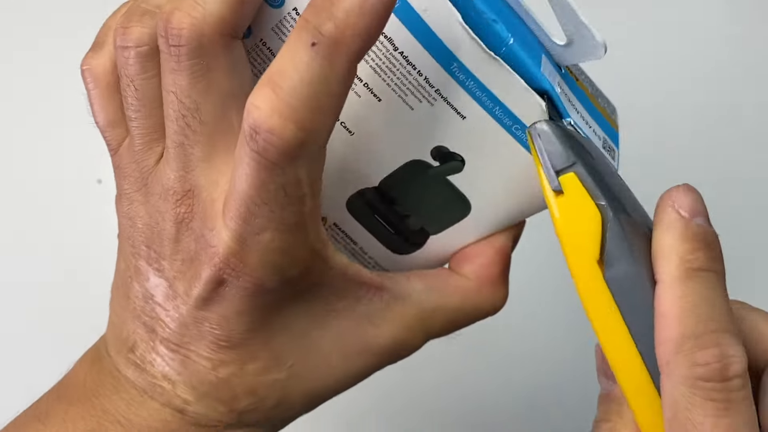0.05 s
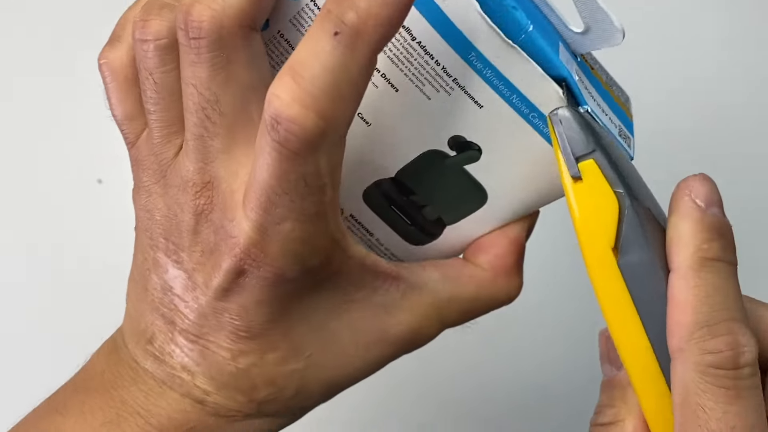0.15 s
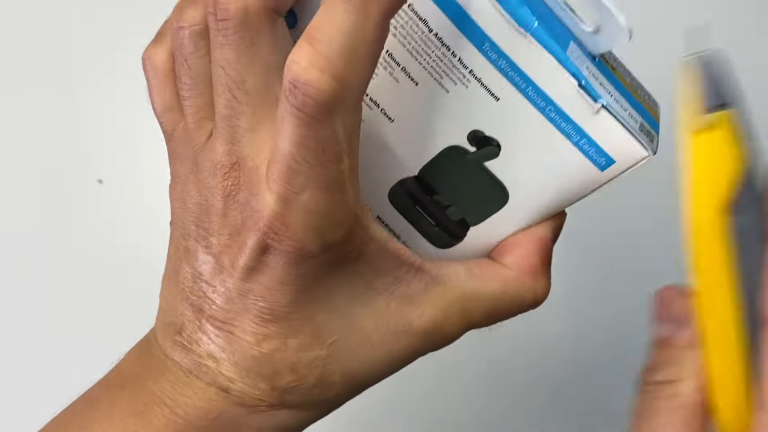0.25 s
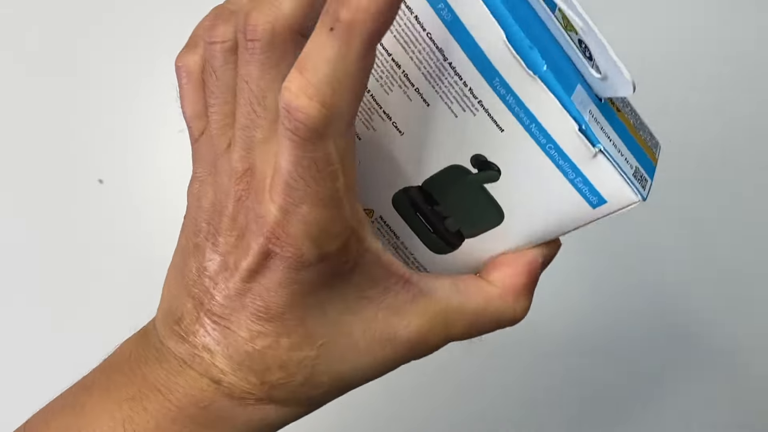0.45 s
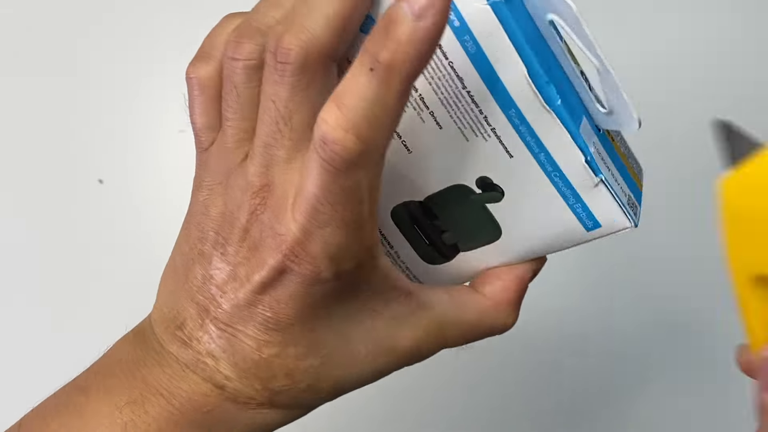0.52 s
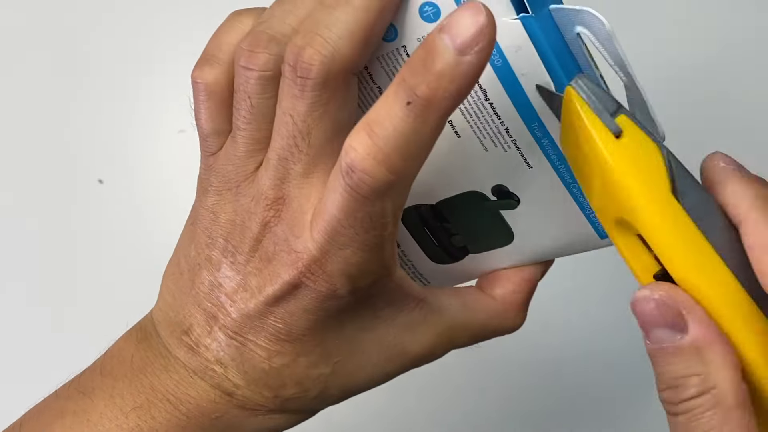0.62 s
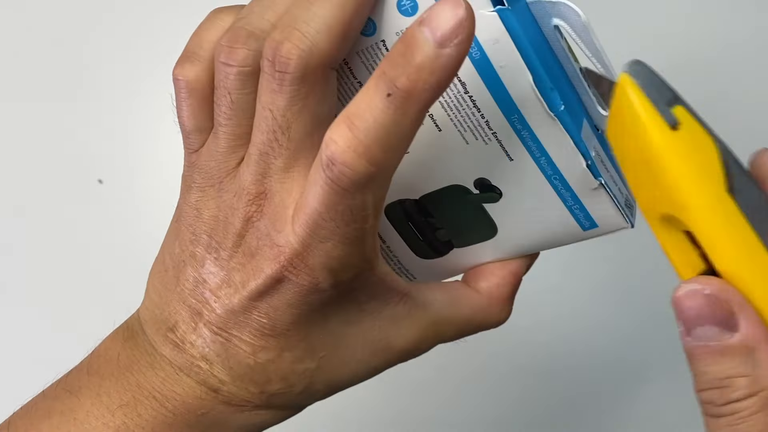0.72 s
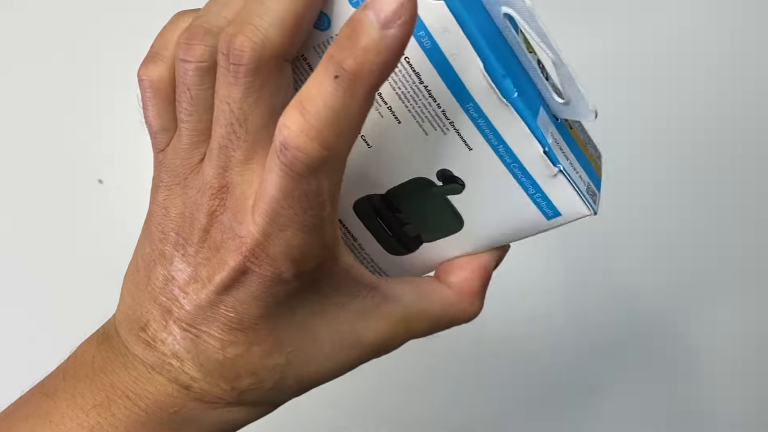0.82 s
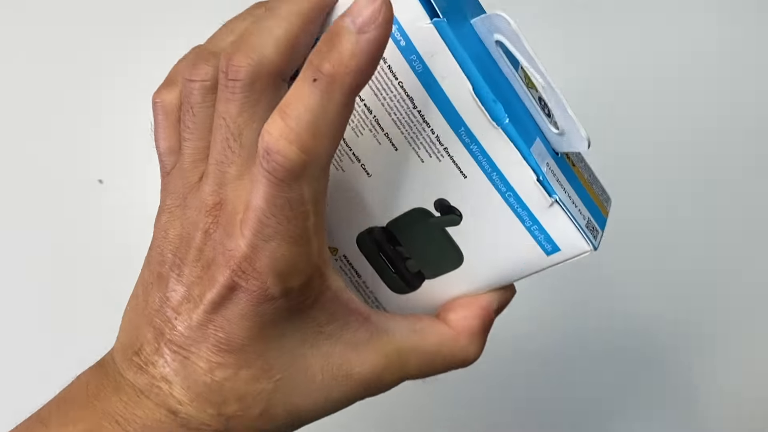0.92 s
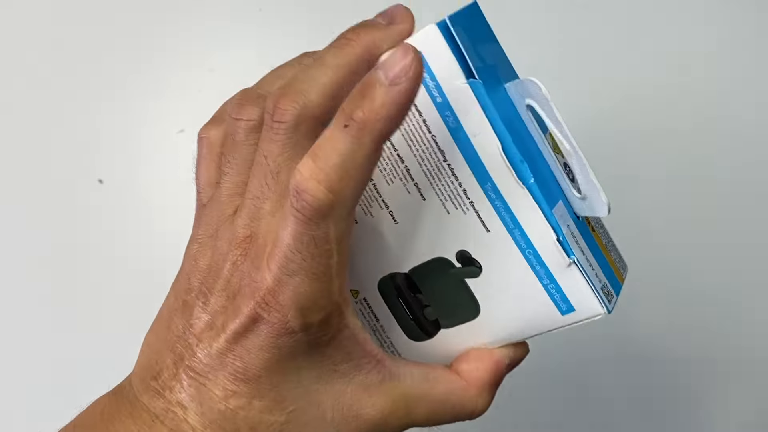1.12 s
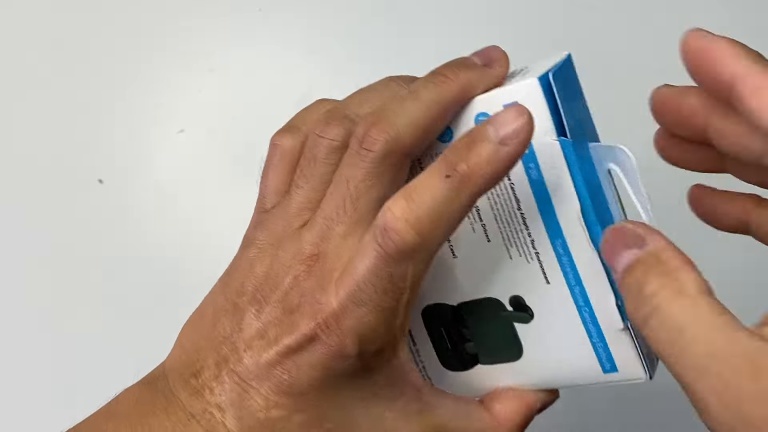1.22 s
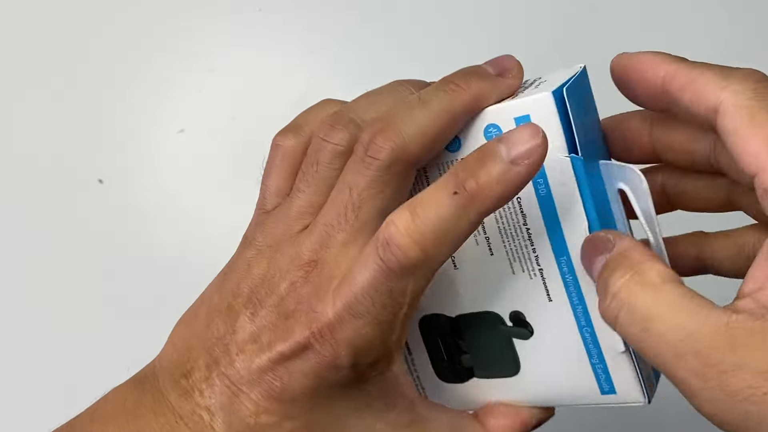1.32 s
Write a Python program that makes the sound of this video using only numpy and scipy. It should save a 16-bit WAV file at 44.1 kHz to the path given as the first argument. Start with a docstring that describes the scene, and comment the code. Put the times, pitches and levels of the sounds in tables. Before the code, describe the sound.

Close to the microphone in a quiet room, a blade cuts a small carton's tape seal with ticks and a sharp snap. A double clack follows as the knife is put down, then the box scuffs and thuds softly.

```python
"""In a quiet room, close to the microphone, a utility knife cuts the tape seal of a small cardboard box.
The blade drags, ticks through the tape and breaks free with a snap. The knife is laid on the table with a
double clack; the box is shifted, scuffs over the table top and settles with a soft thud. Impacts excite
the damped modes of card, handle and table; friction is a stream of tiny random slips. The room adds
faint reverberation, ventilation rumble and mains hum."""
import sys
import numpy as np
from scipy import signal
from scipy.fft import rfft, irfft
from scipy.io import wavfile

SR = 44100
rng = np.random.default_rng(int(sys.argv[2]) if len(sys.argv) > 2 else 0)


def to_wav(s):
    """Save 16-bit WAV."""
    ch = np.atleast_2d(s).T  # columns
    pcm = np.round(np.clip(ch, -1, 1) * 32767)  # PCM
    wavfile.write(sys.argv[1], SR, pcm.astype(np.int16))


N = 59535
T = np.arange(N) / SR
FREQS = np.arange(N + 1) * SR / (2 * N)


def from_db(db):
    """The decibel scale: 20 dB is a factor of ten in amplitude."""
    return 10 ** (np.asarray(db) / 20)


def coloured(x, colour):
    """Spectral shaping: noise is filtered to the given colour, then scaled to unit rms."""
    hz, db = np.transpose(colour)
    gain = from_db(np.interp(np.log(FREQS + 1), np.log(hz), db))
    shaped = irfft(rfft(x, 2 * N) * gain)[..., :N]
    return shaped / np.sqrt(np.mean(shaped ** 2))


def envelope(start, hold, attack, release):
    """Exponential decay: after a linear rise, it sets in at start + hold with time constant release."""
    return np.clip((T - start) / attack, 0, 1) * np.exp(-np.maximum(T - start - hold, 0) / release)


def rubbed(strokes, colour, per_s, spread_db):
    """Stick-slip friction: tiny random slips swell and fade with the pressure of each stroke."""
    pressure = sum(from_db(db) * envelope(start, length, 0.45 * length, release)
                   for start, length, db, release in strokes)
    sizes = from_db(spread_db * np.minimum(rng.exponential(1, N), 4))
    slips = (rng.random(N) < per_s / SR) * sizes * rng.choice([-1, 1], N)
    return pressure * coloured(slips, colour)


def struck(hits, modes, rise_s, uneven_db):
    """Modal superposition: each hit rings all modes, which swell as bending waves cross the body."""
    hz, db, t60 = np.transpose(modes)[:, :, None]
    travel_s = 0.0011 * np.sqrt(1000 / hz)  # dispersion: higher bending waves arrive sooner
    t = np.maximum(T[:SR // 5] - travel_s, 0)
    rings = np.sin(2 * np.pi * hz * t) * from_db(db - 60 * t / t60) * (1 - np.exp(-t / rise_s))
    octaves = np.log2(hz) - np.log2(hz).mean()
    out = np.zeros(2 * N)
    for start, level_db, tilt_db in hits:
        i = max(int(start * SR), 0)
        gains = from_db(level_db + tilt_db * octaves + uneven_db * rng.standard_normal(hz.shape))
        out[i:i + t.shape[1]] += (rings * gains).sum(0)
    return out[:N]


def crack(hits, level_db, hold_s, attack_s, release_s):
    """Contact noise: a brief broadband crunch accompanies each hit."""
    # spectrum of the crunch: f/Hz, level/dB
    colour = [(300, -16.5), (750, -12), (1400, -8), (2400, -0.5), (4000, -5), (6000, -5.5), (7500, -9.5),
              (10000, -10.5), (13000, -16), (15500, -18.5)]
    bursts = sum(from_db(db + level_db) * envelope(start, hold_s, attack_s, release_s)
                 for start, db, _ in hits)
    return bursts * coloured(rng.standard_normal(N), colour)


def diffuse(mid, side):
    """Diffuse-field coherence: the two microphone ports agree in the bass and differ in the treble."""
    corner_hz = 450
    side = irfft(rfft(side, 2 * N) * FREQS ** 2 / np.hypot(FREQS ** 2, corner_hz ** 2))[:N]
    return mid + side * [[1], [-1]]


def background():
    """Ambient noise: a diffuse field of ventilation rumble, with a faint pure tone of mains hum."""
    # spectrum of the rumble: f/Hz, level/dB
    colour = [(20, -25.5), (32, -18), (42, -5.5), (52, 5), (72, -6), (105, -5.5), (140, -11), (190, -17.5),
              (350, -17), (600, -22.5), (1200, -33), (2300, -33.5), (4000, -44), (7000, -66),
              (11000, -57.5), (16000, -75.5)]
    mid, side = from_db(-52) * coloured(rng.standard_normal((2, N)), colour)
    hum = from_db(-56.5) * np.sqrt(2) * np.sin(2 * np.pi * 120.2 * T)
    return diffuse(mid, from_db(-5) * side) + hum


def blade_drag():
    """Sliding friction: blade and fingers drag over the card in fine slips."""
    # strokes: t/s, length/s, level/dB, release/s
    slides = [(0, 0.05, -48.5, .01), (.044, 0.0091, -50, 0.0018), (0.153, .035, -67.5, 0.012),
              (.229, 0.006, -33.5, 0.0014), (0.337, .04, -66.5, 0.012), (.659, 0.0083, -57.5, 0.0064),
              (.72, .03, -67.5, 0.03), (.769, 0.008, -44.5, 0.0038), (0.824, .008, -59, 0.011),
              (1.035, 0.013, -51.5, .004)]
    # spectrum of the drag: f/Hz, level/dB
    colour = [(200, -13.5), (800, 1.5), (1600, 7.5), (3500, -1.5), (5500, -3), (7500, -11.5), (10000, -6.5),
              (13000, -11), (15500, -17)]
    return rubbed(slides, colour, per_s=2900, spread_db=1)


def finger_grips():
    """Dry friction: gripping fingers draw soft, dull rubs from the card."""
    # rubs: t/s, length/s, level/dB, release/s
    grips = [(0, 0.0097, -54, 0.014), (.0455, .006, -36, .003), (.623, 0.013, -45.5, 0.0029),
             (.979, 0.03, -51.5, 0.0047), (1.315, .015, -62, 0.0068)]
    # spectrum of a rub: f/Hz, level/dB
    colour = [(120, -11.5), (220, -2.5), (450, 8), (750, -10.5), (1100, -6), (1700, -9.5), (2800, -19),
              (5000, -29.5), (10000, -52), (15500, -51)]
    return rubbed(grips, colour, per_s=11000, spread_db=2.5)


def tape_ticks():
    """Impulse excitation: tape and card give way in small ticks, each ringing the carton."""
    # ticks: t/s, level/dB, tilt/(dB per octave)
    ticks = [(.0218, -0.5, 1.5), (.0468, -17, 1), (.0718, -5, 0), (.1308, 1.5, -0.5), (.1919, 3.5, 0.5),
             (.661, -25.5, 11), (1.0605, 0.5, 6), (1.0688, 0, 8), (1.0738, -13, -2)]
    # modes of the carton: f/Hz, level/dB, T60/s
    modes = [(1430, -23, 0.0099), (2630, -32.5, 0.0064), (3920, -21, 0.0069), (4640, -36, 0.016),
             (5600, -30.5, .009), (6500, -34.5, 0.0022), (9390, -40.5, .009), (10400, -47, .009),
             (12200, -42, .007), (15000, -45, .007)]
    ring = struck(ticks, modes, rise_s=0.00082, uneven_db=1)
    return ring + crack(ticks, level_db=-43.5, hold_s=0.004, attack_s=0.001, release_s=0.0015)


def box_knocks():
    """Resonance of a hollow body: soft knocks excite the low modes of the box."""
    # knocks: t/s, level/dB, tilt/(dB per octave)
    bumps = [(.046, -14, -7), (.2378, 3.5, -2), (.626, -16, -2), (.982, -12.5, 5), (.9885, -5, -12),
             (1.051, 3, 7.5), (1.0675, 7, -5), (1.074, -3, -2), (1.323, -30, 0)]
    # modes of the box: f/Hz, level/dB, T60/s
    modes = [(265.5, -35.5, .042), (385, -34, 0.032), (510, -35, .025), (760.3, -39.5, 0.064),
             (1156, -39, 0.041)]
    return struck(bumps, modes, rise_s=0.00075, uneven_db=1.5)


def card_hisses():
    """Friction noise: blade and skin slide over the card, dense slips merging into a bright hiss."""
    # strokes: t/s, length/s, level/dB, release/s
    strokes = [(.054, .026, -52, 0.0043), (.475, 0.056, -67.5, .025), (.9, .02, -65, 0.011),
               (.926, 0.014, -48, 0.012), (.96, 0.069, -64.5, 0.025), (1.258, 0.014, -70.5, 0.0056)]
    # spectrum of the hiss: f/Hz, level/dB
    colour = [(300, -11.5), (1200, -7.5), (3000, -0.5), (5500, -2.5), (7500, -9.5), (10000, -7),
              (13000, -10), (15500, -13.5)]
    return rubbed(strokes, colour, per_s=12000, spread_db=2.5)


def flap_snap():
    """Release of elastic energy: the blade breaks free and the flap springs and rings."""
    # snaps: t/s, level/dB, tilt/(dB per octave)
    snaps = [(.2352, -18.5, -3.5), (.2396, -11.5, 1), (.2408, 3, 0.5)]
    # modes of the flap: f/Hz, level/dB, T60/s
    modes = [(410, -32, 0.035), (626, -33.5, .012), (1614, -15, 0.017), (2375, -13, 0.015),
             (2600, -13, 0.013), (3100, -19, .012), (3763, -11.5, 0.016), (4810, -24.5, .008),
             (5460, -18, 0.0096), (7060, -22.5, .007), (9570, -12, 0.0072), (10900, -20.5, 0.006),
             (12700, -21.5, 0.006), (14500, -29, .008)]
    ring = struck(snaps, modes, rise_s=0.0005, uneven_db=0.5)
    return ring + crack(snaps, level_db=-20, hold_s=0.0015, attack_s=0.00021, release_s=0.0025)


def knife_clacks():
    """Free vibration after impact: the handle lands on one end, then the other; loose parts buzz."""
    # landings on the table: t/s, level/dB, tilt/(dB per octave)
    clacks = [(.7754, -6, -4), (.7862, -1.5, 0.5)]
    # modes of the plastic handle: f/Hz, level/dB, T60/s
    modes = [(1046, -34.5, 0.031), (1516, -29, 0.032), (1596, -29.5, 0.021), (2230, -33, .022),
             (2426, -31.5, 0.086), (2732, -23, 0.033), (3395, -27, 0.017), (4217, -31, 0.025),
             (4650, -28.5, 0.016), (5450, -34, .011), (9000, -62, 0.015), (10600, -53, 0.016),
             (14500, -58, .012)]
    ring = struck(clacks, modes, rise_s=0.0006, uneven_db=5)
    return ring + crack(clacks, level_db=-33.5, hold_s=0.00092, attack_s=0.00074, release_s=0.0076)


def box_scuffs():
    """Stick-slip friction: the box scuffs grittily over the table."""
    # scuffs: t/s, length/s, level/dB, release/s
    scuffs = [(1.047, 0.015, -38, .004), (1.057, 0.011, -32, .004), (1.0674, 0.012, -34, .003),
              (1.082, 0.017, -50, .01), (1.17, 0.045, -79, .02)]
    # spectrum of a scuff: f/Hz, level/dB
    colour = [(120, -2), (300, 0), (600, -1), (1100, -1.5), (2200, -6.5), (4000, -9), (5500, -6.5),
              (7000, -16.5), (10000, -17), (13000, -23), (15500, -29)]
    return rubbed(scuffs, colour, per_s=3300, spread_db=-0.5)


def table_thud():
    """Plate vibration: the weight of the box comes down and excites the table top's low modes."""
    # landings: t/s, level/dB, tilt/(dB per octave)
    thuds = [(1.049, -15, -5), (1.066, -3.5, 7.5)]
    # modes of the table top: f/Hz, level/dB, T60/s
    modes = [(107, -22, 0.12), (157, -36, 0.078)]
    return struck(thuds, modes, rise_s=0.0017, uneven_db=1.5)


def room(x):
    """Reverberation by convolution: near surfaces answer quickly, the walls later and more faintly."""
    # reflected sound: delay/s, level/dB, T60/s, low-pass f/Hz
    reflections = [(.008, -20, 0.12, 5970), (.02, -34, .42, 5875)]
    response = 0
    for delay, db, t60, edge_hz in reflections:
        lowpass = signal.butter(1, edge_hz, fs=SR, output="sos")
        tail = signal.sosfilt(lowpass, rng.standard_normal((2, N)))
        tail *= envelope(delay, hold=0, attack=0.0037, release=t60 / np.log(1000))
        low_band_gain = np.abs(rfft(tail))[:, :N // 10].mean()
        response = response + from_db(db) * tail / low_band_gain
    mid, side = irfft(rfft(x, 2 * N) * rfft(response, 2 * N))[:, :N]
    return diffuse(mid, from_db(-9.5) * side)


def ports(x):
    """Phase difference: sound reaches the two microphone ports out of step, most of all in the treble."""
    # lead of the left port: f/Hz, phase/rad
    port_phase = [(0, 0), (600, -.5), (1600, -.2), (2500, .65), (3300, .3), (4400, .95), (5100, .25),
                  (6000, 1.7), (7100, 3.1), (8500, 4.4), (10400, 6.2), (12000, 8), (13500, 9.4),
                  (16000, 12.3)]
    lead = np.interp(FREQS, *np.transpose(port_phase))
    return irfft(rfft(x, 2 * N) * np.exp(0.5j * lead * np.array([[1], [-1]])))[:, :N]


def scene():
    """Superposition: the direct sound of knife and box, its reverberation and the background add."""
    impacts = tape_ticks() + flap_snap() + knife_clacks() + box_knocks() + table_thud()
    friction = box_scuffs() + blade_drag() + finger_grips() + card_hisses()
    direct = impacts + friction
    return ports(direct + room(direct)) + background()


def record(dry):
    """Band limiting: a steep low-pass filter removes the highest treble."""
    cutoff_hz = 15800
    return signal.sosfilt(signal.ellip(10, 0.1, 80, cutoff_hz, fs=SR, output="sos"), dry)


dry = scene()
out = record(dry)
to_wav(out)
```